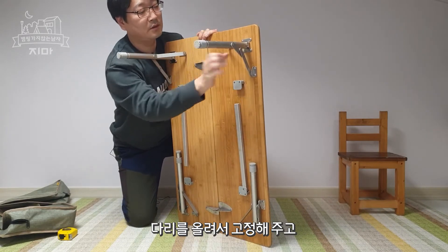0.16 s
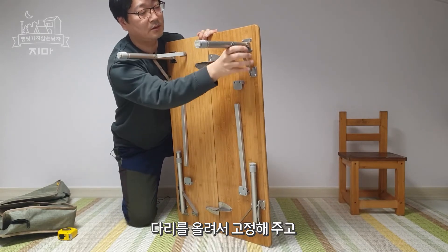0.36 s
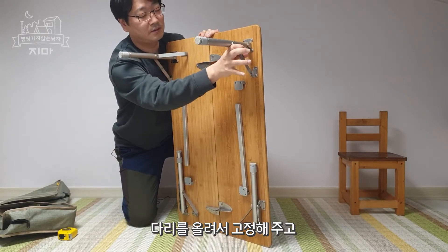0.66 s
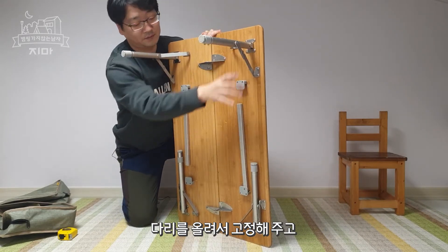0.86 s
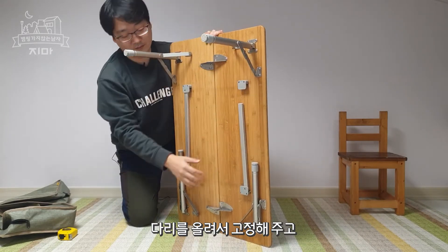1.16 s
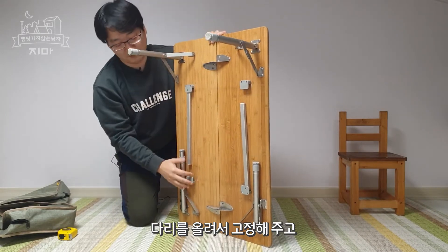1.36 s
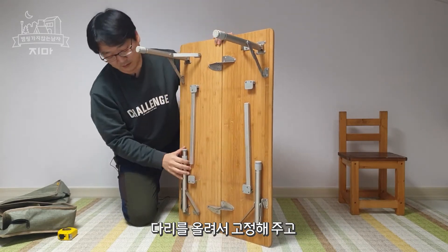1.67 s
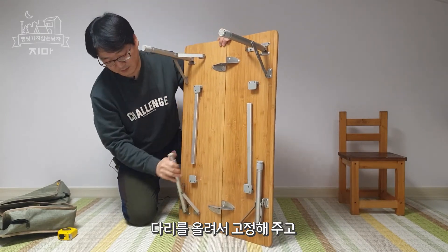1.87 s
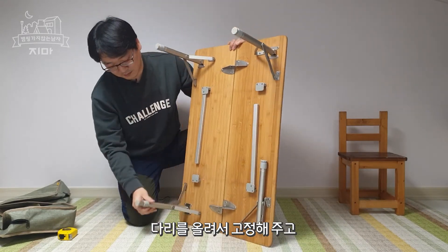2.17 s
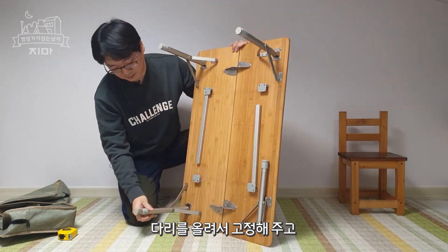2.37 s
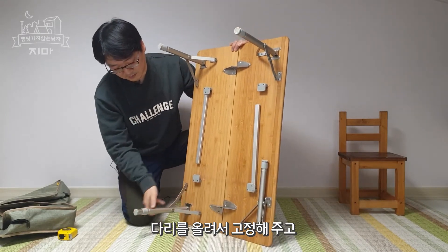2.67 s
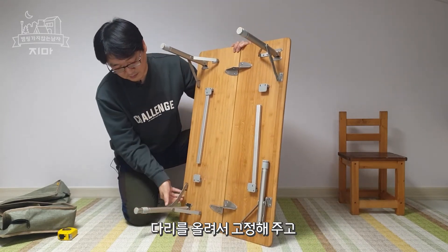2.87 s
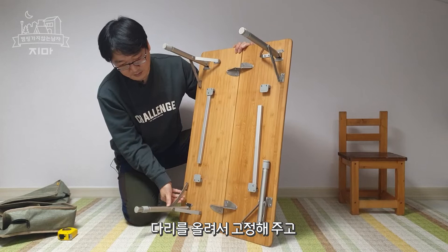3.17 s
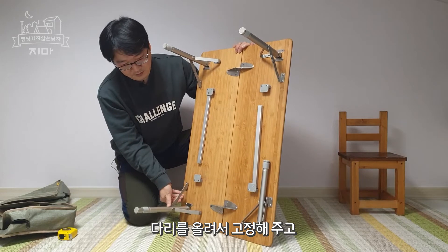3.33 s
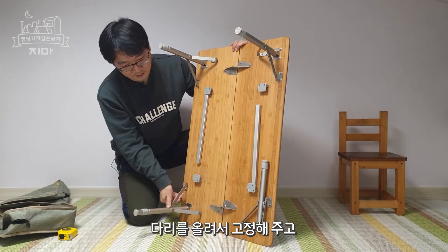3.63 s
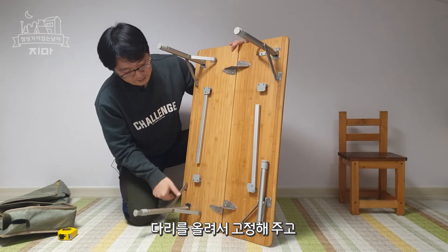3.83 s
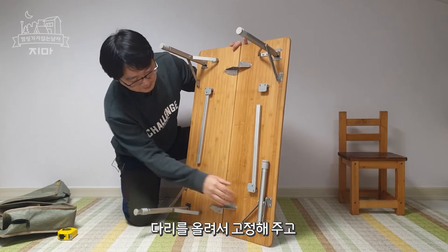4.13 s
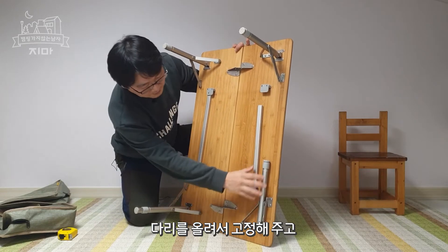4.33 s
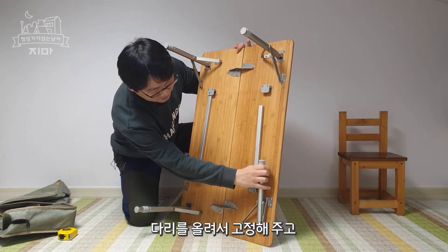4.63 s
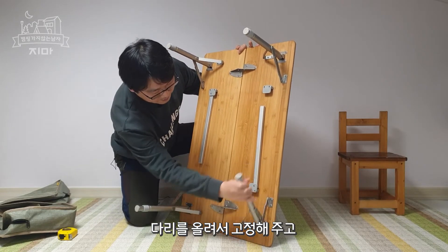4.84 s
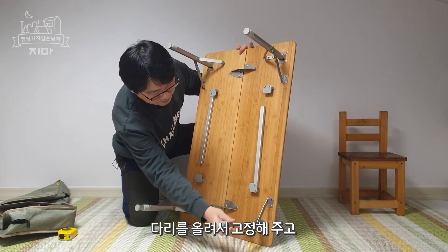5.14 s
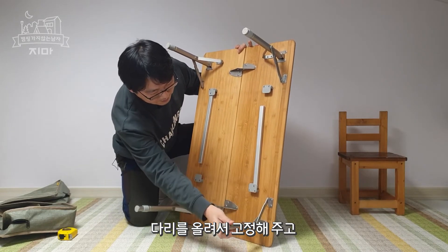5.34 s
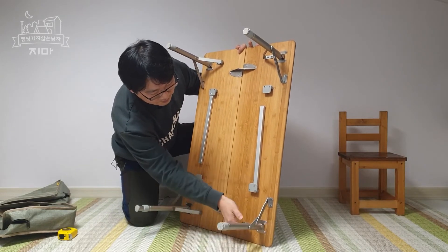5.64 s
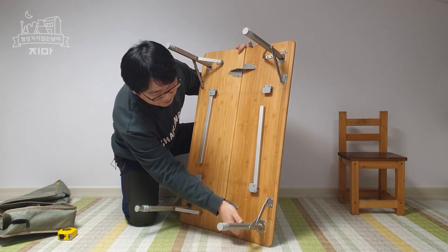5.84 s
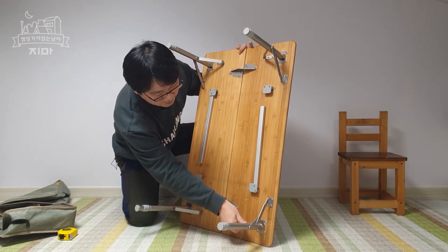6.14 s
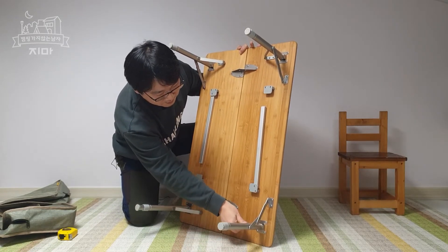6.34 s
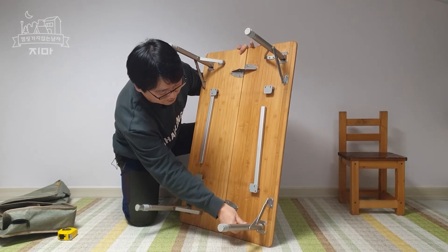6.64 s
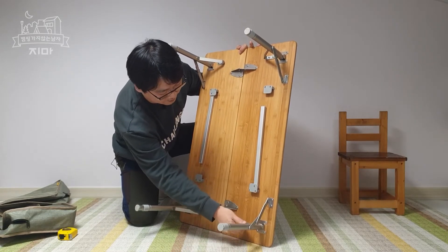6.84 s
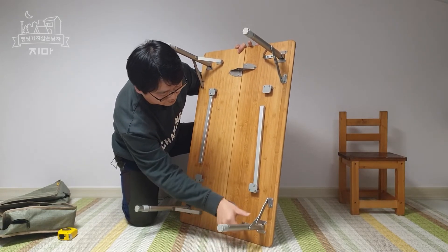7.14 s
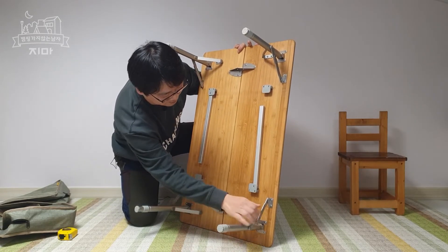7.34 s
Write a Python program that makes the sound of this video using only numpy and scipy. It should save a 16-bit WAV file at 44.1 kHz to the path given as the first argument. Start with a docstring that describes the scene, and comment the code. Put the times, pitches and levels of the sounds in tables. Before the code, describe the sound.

A quiet bare room with faint air noise and a barely noticeable hum, captured fairly close. Hands rub a wooden table board and fittings scrape softly. At 0.4 s a metal knock leads into a very loud, sharp clack at 0.5 s, hard steel on resonant wood with a short room tail, then small aftertaps to 0.8 s. From 1.4 to 2.0 s, a leg grinds briefly and clinks in a rattling cluster, ending in a strong clack just before 2 s. A bright click comes at 2.35 s, then faint rubbing and a thin, airy cloth whistle around 3 s. Dull knocks at 3.45 s and small rattles to 4 s follow. At 4.5 s come a crisp click and grind, then a faint board drone until about 5.1 s. Quiet hisses and hinge rasps occupy 5.3 to 6.1 s, another tiny whistle 6.4 s, and light taps 6.8 to 7.35 s.

```python
"""Folding a table out

Steel legs under a folding wooden table top swing out and their braces snap shut, in a quiet bare room.
Impacts excite decaying modes of board and brace; chattering steel is short noise bursts of set spectrum.
Rubbing, scraping and hissing are coloured noise, while grinding, rasping and droning are noise-fed modes.
Now and then sliding cloth whistles: bundles of sine tones whose pitches glide together."""
import sys
import numpy as np
from scipy import signal
from scipy.fft import rfft, irfft
from scipy.io import wavfile
from scipy.ndimage import uniform_filter1d

SR = 44100
rng = np.random.default_rng(int(sys.argv[2]) if len(sys.argv) > 2 else 0)


def put_to_file(sound):
    """Save the sound as 16-bit audio at rate SR, in the file named by the first command-line argument."""
    columns = np.atleast_2d(sound).T  # one column per channel
    safe = np.clip(columns, -1, 1)
    whole_steps = np.round(safe * 32767)
    wavfile.write(sys.argv[1], SR, whole_steps.astype(np.int16))


N = 330750   # samples, 7.5 s

# In all tables: levels are relative, before the gains in the functions; T60 is the time to fall by 60 dB.
# Spectra are densities: f/Hz, level per Hz/dB.

# Air and hum of the room: spectrum
AIR_SPECTRUM = [(15, -36), (25, -2), (71, 9.5), (237, -10), (301, -12.5), (404, -16), (790, -21),
                (1000, -27.5), (1310, -34.5), (2850, -32), (4500, -29), (6370, -20.5), (8100, -18),
                (11500, -32.5), (15000, -64)]
AIR_DB, HUM_DB, HUM_HZ = -68.5, -82, 300

# Hands on the table: t/s, rub on wood level/dB, scrape of fittings level/dB
HAND_LEVELS = [(0.0, -56.5, -55.5), (0.14, -79, -85), (0.27, -63, -65), (0.4, -68.5, -76), (0.55, -50, -45),
               (0.75, -72.5, -76), (0.83, -64.5, -62), (1.02, -83, -84), (1.44, -82, -73),
               (1.56, -60.5, -69), (2.02, -59.5, -55), (2.33, -64.5, -66), (2.4, -55, -52.5),
               (2.53, -67, -64.5), (2.64, -63.5, -64), (2.71, -102.5, -85), (2.94, -70.5, -79),
               (3.09, -62.5, -67.5), (3.17, -73.5, -78), (3.61, -71.5, -75.5), (3.91, -70, -66.5),
               (4.11, -78.5, -77), (4.47, -71.5, -82), (4.7, -66.5, -65), (5.18, -65, -80),
               (5.37, -66, -78), (5.55, -89, -84), (5.8, -77, -83), (6.3, -89.5, -88.5),
               (6.51, -64.5, -75.5), (6.62, -92, -94), (6.95, -65.5, -76.5), (7.12, -76.5, -87.5),
               (7.3, -74.5, -80), (7.5, -80, -92)]
# Jolts of the held board: t/s, level/dB
JOLTS_OF_BOARD = [(0.0, -50.5), (0.14, -59), (0.39, -46), (0.51, -48), (0.818, -50.5), (1.53, -51),
                  (1.68, -51.5), (2.41, -56), (2.57, -56), (2.939, -61.5), (3.09, -60), (3.7, -53),
                  (4.46, -56), (4.555, -47), (4.76, -59.5), (5.101, -51), (5.22, -56.5), (5.409, -57.5),
                  (6.299, -65), (6.469, -59.5), (6.97, -67), (7.341, -51.5), (7.47, -54)]
JOLT_RISE_S, JOLT_FALL_S = 0.027, 0.073
# Sway modes of the held board: f/Hz, level/dB, T60/s
SWAY_MODES = [(56, -9, .3), (70.4, 0, 0.23)]
# Palms on wood, creaking board, scraping fittings: spectra
RUB_SPECTRUM = [(300, -15.5), (420, -4.5), (600, -2.5), (780, -1.5), (950, -9), (1200, -25)]
CREAK_SPECTRUM = [(100, -15.5), (140, -2.5), (200, -1), (300, 0.5), (400, -4), (520, -27)]
SCRAPE_SPECTRUM = [(800, -27), (1000, -1.5), (1250, 3.5), (1600, -4), (2200, -7), (2800, -13.5),
                   (3600, -21.5)]
CREAK_DB = -2.5   # relative to the rub

# Legs turning and sleeves sliding: start t/s, length/s, hiss level/dB, thin top level/dB
SWING_STROKES = [(-0.1, 0.14, -66.5, -71), (0.3, .25, -72.5, -101), (0.76, 0.12, -73.5, -84.5),
                 (1.5, 0.43, -69.5, -87), (1.9, 0.46, -66.5, -70.5), (2.5, 0.17, -69.5, -76.5),
                 (2.66, 0.053, -74, -73), (3.0, 0.16, -77, -74.5), (3.74, 0.21, -74, -101),
                 (4.15, .3, -71, -81), (4.49, 0.045, -61, -67), (4.63, 0.19, -65.5, -66.5),
                 (4.85, 0.36, -69, -74), (5.16, .05, -76.5, -88), (5.3, .08, -70, -68),
                 (5.44, 0.085, -68, -64.5), (5.55, 0.093, -70, -74), (6.03, 0.026, -75, -93.5),
                 (6.42, 0.089, -82, -79), (6.93, 0.051, -69.5, -74), (7.35, .2, -76, -81)]
SWING_RISE_S, SWING_FALL_S = 0.034, 0.023   # rasps share these
# Dry friction and its thin top: spectra
HISS_SPECTRUM = [(3200, -24), (3600, -18), (3950, -1.5), (4900, -2.5), (6200, -1.5), (7700, -3.5),
                 (8400, -6.5), (10000, -8.5), (11500, -12)]
THIN_SPECTRUM = [(9000, -21.5), (10300, -12.5), (12700, 3.5), (14500, -9), (16000, -12)]
# Ringing part of the thin top: f/Hz, level/dB, T60/s
THIN_MODES = [(11500, 0, 0.0042)]
# The last leg droning through the board: start t/s, length/s, upper level/dB, lower level/dB
DRONE_STROKES = [(4.63, 0.52, -68, -68), (5.3, .05, -85, -73), (5.575, .05, -100, -75),
                 (5.753, 0.34, -109.5, -84.5)]
DRONE_UPPER_HZ, DRONE_LOWER_HZ, DRONE_T60_S = 1204, 782, 0.065
# Rasps of a hinge: start t/s, length/s, level/dB
RASP_STROKES = [(5.41, 0.057, -71.5), (5.56, 0.13, -71), (5.78, 0.1, -78), (5.97, .12, -78.5)]
# High modes of that hinge: f/Hz, level/dB, T60/s
HINGE_MODES = [(4390, -8, .012), (5240, -1, 0.0065), (6430, 3.5, .008), (7700, -5, 0.01)]

# Metal on metal and on wood: t/s, knock level/dB, knock f/Hz, brace rattle level/dB, click level/dB
CONTACT_EVENTS = [(0.367, -46.5, 825, -68.5, -73.5), (0.377, -28.5, 920, -38, -51.5),
                  (0.485, -29.5, 1090, -46, -53), (0.497, -45, 810, -42.5, -47.5),
                  (0.515, -13.5, 963, -18, -24.5), (0.53, -23, 1010, -33, -62),
                  (0.626, -34, 1080, -67, -59), (0.764, -54, 1250, -58, -89), (0.803, -40.5, 770, -39, -64),
                  (1.489, -33.5, 1270, -46, -60.5), (1.521, -38, 1250, -51, -56),
                  (1.541, -43, 805, -41, -54), (1.58, -30, 1400, -32, -37.5),
                  (1.624, -53, 606, -39.5, -40.5), (1.705, -33.5, 890, -43, -56.5),
                  (1.752, -39.5, 1080, -68, -68), (1.805, -45, 1210, -44, -51),
                  (1.866, -48, 1250, -50.5, -58), (1.919, -33.5, 1180, -50, -48),
                  (1.964, -23, 1270, -28.5, -37.5), (1.979, -30, 1020, -47, -50),
                  (2.247, -48.5, 604, -48, -53), (2.341, -37.5, 870, -30.5, -28),
                  (2.427, -41, 680, -37.5, -55), (2.551, -55, 606, -70.5, -66),
                  (3.451, -37, 606, -46, -56.5), (3.466, -39, 920, -42.5, -70),
                  (3.715, -56, 799, -57.5, -67), (3.784, -44.5, 900, -50.5, -58),
                  (3.807, -48, 719, -44, -55), (3.845, -53.5, 816, -52.5, -61), (3.889, -68, 840, -51, -65),
                  (3.967, -47.5, 670, -42, -55), (4.111, -60.5, 800, -63.5, -62),
                  (4.453, -54, 780, -67, -68), (4.524, -38, 1560, -56, -37), (4.554, -39, 840, -38, -37.5),
                  (4.571, -47, 766, -41, -49), (5.109, -63, 764, -73, -66.5),
                  (6.809, -56.5, 595, -66, -59.5), (6.838, -51.5, 675, -57, -57),
                  (6.944, -50, 748, -58, -55.5), (7.159, -66, 762, -59, -51.5),
                  (7.175, -47.5, 790, -51.5, -58), (7.337, -41, 747, -54, -50.5)]
# Modes of the board, its dull low modes, and the brace: f/Hz, level/dB, T60/s
BOARD_MODES = [(603, 4, 0.064), (751, 0.5, 0.064), (842, 1.5, .06), (852, 3.5, 0.019), (938, 5, 0.025),
               (1013, 1.5, 0.016), (1090, 5, 0.021), (1220, 4, .04), (1400, -3.5, 0.053),
               (1383, -16.5, 0.16)]
DULL_MODES = [(173, -4, 0.049), (274, -2, 0.023), (356.3, -3, 0.085), (486, 1.5, .05)]
BRACE_MODES = [(1450, -1, .05), (1600, -4, .03), (1910, 1, .06), (2050, -3, .03), (2330, -3, .035),
               (2900, -7, .025)]
# Brace rattle, catch click and thin tick: spectra
RATTLE_SPECTRUM = [(900, -60.5), (1300, -15), (1600, 7.5), (2000, -4), (2500, 1), (3000, -7.5), (3600, -8),
                   (4600, -57.5)]
CLICK_SPECTRUM = [(2200, -53.5), (3000, -28), (3800, -2), (4700, 0.5), (6000, -2.5), (7500, -4),
                  (9000, -14), (13000, -61)]
TICK_SPECTRUM = [(5000, -60), (7500, -11), (9000, -1.5), (11500, 0.5), (14000, -9.5), (16000, -10),
                 (18000, -57.5)]
KNOCK_OCTAVES = 0.51   # distance from the knock's pitch where a mode's share falls to 1/e
DULL_DB, DULL_DB_PER_OCTAVE = -12, -18   # at a knock of 800 Hz; higher knocks wake the dull modes less
# Softness is rattle level minus click level, held within 0 to 30 dB
CONTACT_MS, CONTACT_DOUBLES_DB = 2.9, 24.5   # decay constant at no softness; softness that doubles it
TICK_DB, TICK_SOFTENS = -7, 0.1   # tick relative to the click level; dB lost per dB of softness
BRACE_LOW_HZ, BRACE_HIGH_HZ = 1940, 2320   # range of the pitch favoured in each chatter
BRACE_OCTAVES, BRACE_DB = 0.1, 7   # 1/e half-width and lift of that pitch

# Reverberation: f/Hz, T60/s, level/dB
ROOM_BANDS = [(100, 0.62, -16.5), (282, 0.26, 13.5), (840, 0.23, 0.5), (2000, 0.33, -0.5), (5000, 0.33, -2),
              (12200, .26, 0)]
ROOM_DB, FIRST_WALL_S = -4, 0.0096   # gain; time over which the reflections grow to full density

# Leg grinding through its clip or brace slot: start t/s, length/s, low, middle and high ring level/dB
GRIND_STROKES = [(1.39, 0.055, -61, -55.5, -80), (1.445, 0.013, -48, -46.5, -78),
                 (1.495, 0.031, -51, -43, -86), (1.58, 0.034, -47, -69, -64),
                 (1.92, 0.013, -34.5, -41.5, -64), (4.47, .04, -54, -68, -47),
                 (4.525, 0.047, -40, -41.5, -72), (4.6, 0.041, -54, -58, -75), (7.47, .04, -51, -74, -64.5)]
GRIND_RISE_S, GRIND_FALL_S = 0.0078, 0.0077
# Modes of the leg in low, middle, upper and high groups: f/Hz, level/dB, T60/s (3 ms at least when rung)
LEG_MODE_GROUPS = ([(770, 4.5, 0.055), (913, 8.5, 0.017)], [(1240, 4, 0.0027), (1640, 10.5, 0.0033),
                   (1990, -10.5, 0.011)], [(2410, 0, .025)], [(7150, -5, 0.016), (9940, -6.5, 0.022),
                   (13100, -0.5, 0.0024)])

# Weave of a sleeve whistling, one list per whistle: t/s, f/Hz, level/dB
WHISTLE_CURVES = [
    [(2.898, 8530, -67), (2.97, 11220, -71.5), (3.03, 11820, -67), (3.09, 11400, -70), (3.16, 9680, -75),
     (3.21, 9920, -65.5), (3.27, 9670, -109)],
    [(5.7, 10530, -98), (5.74, 11500, -74), (5.775, 12260, -72.5), (5.82, 11270, -73), (5.86, 10100, -94.5)],
    [(6.27, 10900, -104.5), (6.32, 11460, -70), (6.37, 11600, -67.5), (6.395, 11100, -82),
     (6.44, 12150, -64.5), (6.48, 11200, -66), (6.53, 9910, -89)],
]
# Lines of the weave: ratio to the pitch, level/dB
WEAVE_LINES = [(.72, 1), (.79, -6), (.87, -12), (.94, -9), (1.0, 0), (1.12, -13)]
# Ring of the cloth: f/Hz, level/dB
CLOTH_RESPONSE = [(7000, -28), (8400, -8), (9700, -10), (11600, 3), (13500, -19)]

BASS_CUT_HZ, STOPBAND_HZ = 35, 15650   # the top is down 60 dB from the stopband edge


def amp(db):
    """Logarithmic level: gain is 10 to the power of dB / 20."""
    return 10 ** (np.asarray(db) / 20)


def rms_one(x):
    """Equal power: scale a signal to rms 1."""
    return x / np.sqrt(np.mean(x ** 2) + 1e-20)


def in_time(rows, outside_db=-120):
    """Linear interpolation: columns of a curve per sample, with -120 in every column outside its span."""
    s, *columns = np.transpose(rows)
    t = np.arange(N) / SR
    return [np.interp(t, s, column, outside_db, outside_db) for column in columns]


def at_hz(points, hz, order=1):
    """Logarithmic frequency scale: one column of a table, interpolated by octave."""
    table = np.array(points)
    return np.interp(np.log(hz), np.log(table[:, 0]), table[:, order])


def drift(rate):
    """Low-passed randomness: noise through a double pole near the rate in Hz, at rms 1."""
    step = 40   # samples between slow values
    pole = np.exp(-2 * np.pi * rate * step / SR)
    noise = rng.standard_normal(N // step + 2002)
    slow = signal.lfilter([1], [1, -2 * pole, pole * pole], noise)[2000:]   # settled part
    return np.interp(np.arange(N) / step, np.arange(len(slow)), rms_one(slow))


def ring(force, hz, t60):
    """Damped resonance: a unit impulse starts a decaying sine of initial height 1."""
    radius = amp(-60 / (max(t60, .003) * SR))
    angle = 2 * np.pi * hz / SR
    return signal.lfilter([0, np.sin(angle)], [1, -2 * radius * np.cos(angle), radius ** 2], force + 1e-18)


def bands(size):
    """Filter bank: quarter-octave bands of white noise with their centres."""
    edges = 25 * 2 ** (np.arange(38) / 4)
    white = rng.standard_normal((2, size))   # neighbouring bands use different noise
    for k, (low, high) in enumerate(zip(edges, edges[1:])):
        sos = signal.butter(2, [low, high], "band", fs=SR, output="sos")
        yield np.sqrt(low * high), signal.sosfilt(sos, white[k % 2])


def coloured(spectrum, patchy_db, rate):
    """Spectral shaping: noise bands of set density flicker, partly together; rms 1."""
    out, together = 0, drift(rate)
    lowest, highest = np.array(spectrum)[[0, -1], 0]
    for hz, band in bands(N):
        if lowest < hz < highest:
            flicker_db = patchy_db * (.7 * together + drift(rate))
            out = out + amp(at_hz(spectrum, hz) + flicker_db) * band
    return rms_one(out)


def rubbed(modes):
    """Forced vibration: steady friction feeds noise to the modes; rms 1."""
    rings = [amp(level_db) * ring(rng.standard_normal(N), hz, t60) for hz, level_db, t60 in modes]
    return rms_one(sum(rings))


def strokes(rows, rise_s, fall_s):
    """Addition of power: strokes swell up to their start, hold and decay; one gain per level column."""
    t, power = np.arange(N) / SR, 0
    for start, length, *levels_db in rows:
        before = np.minimum(t - start, 0) / rise_s
        after = np.maximum(t - start - length, 0) / fall_s
        shape = np.exp(-before ** 2 - after)
        power = power + (amp(levels_db)[:, None] * shape) ** 2
    return np.sqrt(power)


def room_tone():
    """Stationary noise: still air and microphone noise, with a faint hum as a narrow noise-fed mode."""
    air = coloured(AIR_SPECTRUM, patchy_db=1.2, rate=3)
    hum = rubbed([(HUM_HZ, 0, .6)])
    return amp(AIR_DB) * air + amp(HUM_DB) * hum


def hands():
    """Sliding friction: palms rub the wood and fittings scrape; the held board sways and creaks."""
    rub_db, scrape_db = in_time(HAND_LEVELS)
    jolts = [(s, 0, db) for s, db in JOLTS_OF_BOARD]
    sway_gain, = strokes(jolts, JOLT_RISE_S, JOLT_FALL_S)
    sway = sway_gain * rubbed(SWAY_MODES)
    creak = coloured(CREAK_SPECTRUM, patchy_db=1.5, rate=14)
    rub = coloured(RUB_SPECTRUM, patchy_db=1.5, rate=14)
    scrape = coloured(SCRAPE_SPECTRUM, patchy_db=1.5, rate=15)
    return sway + amp(rub_db) * (rub + amp(CREAK_DB) * creak) + amp(scrape_db) * scrape


def hinges():
    """Dry friction: turning and sliding hiss, a hinge rasps on its modes and the last leg drones on two modes."""
    hiss_gain, thin_gain = strokes(SWING_STROKES, SWING_RISE_S, SWING_FALL_S)
    rasp_gain, = strokes(RASP_STROKES, SWING_RISE_S, SWING_FALL_S)
    upper_gain, lower_gain = strokes(DRONE_STROKES, 0.023, 0.039)
    hiss = coloured(HISS_SPECTRUM, patchy_db=3.0, rate=7)
    thin = amp(-4.5) * coloured(THIN_SPECTRUM, patchy_db=2.0, rate=9)
    thin = thin + amp(-0.5 + 1.5 * drift(8.8)) * rubbed(THIN_MODES)
    drone = upper_gain * rubbed([(DRONE_UPPER_HZ, 0, DRONE_T60_S)])
    drone = drone + lower_gain * rubbed([(DRONE_LOWER_HZ, 0, DRONE_T60_S)])
    return hiss_gain * hiss + thin_gain * thin + drone + rasp_gain * rubbed(HINGE_MODES)


def struck(modes, peak_db, spread_db, pitch_hz=None):
    """Modal excitation: an impulse per contact, of random strength per mode, strongest near any given pitch."""
    out = np.zeros(N)
    at = [round(row[0] * SR) for row in CONTACT_EVENTS]
    luck_db = spread_db * rng.standard_normal((len(CONTACT_EVENTS), len(modes)))
    for k, (hz, level_db, t60) in enumerate(modes):
        near = 1
        if pitch_hz is not None:
            near = np.exp(-(np.log2(hz / pitch_hz) / KNOCK_OCTAVES) ** 2)
        sign = (-1) ** (k // 2)
        force = np.zeros(N)
        force[at] = near * sign * amp(peak_db + level_db + luck_db[:, k])
        out += ring(force, hz, t60)
    return out


def chatter(parts_db, spectra, brace_hz, contact_ms):
    """Magnitude and phase: set spectra give the colour, the phase of dying noise gives the timing."""
    size = 2048
    hz = np.fft.rfftfreq(size, 1 / SR)[1:]
    t_ms = np.arange(size) / SR * 1000
    out = np.zeros(N + size)
    shapes = [rms_one(amp(at_hz(points, hz))) for points in spectra]
    noise = rng.standard_normal((len(CONTACT_EVENTS), size))
    contact_ms = np.clip(contact_ms, .2, 12)
    for row, gains, favoured_hz, white, ms in zip(CONTACT_EVENTS, amp(parts_db).T, brace_hz, noise, contact_ms):
        dying = white * np.sqrt(t_ms) * np.exp(-t_ms / ms)
        timing = np.exp(1j * np.angle(rfft(dying)[1:]))
        lift = amp(BRACE_DB * np.exp(-(np.log2(hz / favoured_hz) / BRACE_OCTAVES) ** 2))
        burst = irfft(np.append(0, (gains @ shapes) * lift * timing), size)
        fade = np.exp(-t_ms / (3.2 * ms)) * np.tanh(t_ms / .4)
        at = round(row[0] * SR)
        out[at:at + size] += burst * fade
    return out[:N]


def contacts():
    """Impact: the board knocks, the brace rattles and the catch clicks; returned apart is the board's low boom."""
    _, knock_db, pitch_hz, rattle_db, click_db = np.transpose(CONTACT_EVENTS)
    knock = struck(BOARD_MODES, knock_db - 8, spread_db=2.5, pitch_hz=pitch_hz)
    wood = signal.butter(2, [550, 1800], "band", fs=SR, output="sos")   # wood takes a blow softly
    knock = signal.sosfilt(wood, knock)

    soft_db = np.clip(rattle_db - click_db, 0, 30)
    brace_hz = rng.uniform(BRACE_LOW_HZ, BRACE_HIGH_HZ, len(CONTACT_EVENTS))
    contact_ms = CONTACT_MS * 2 ** (soft_db / CONTACT_DOUBLES_DB)
    tick_db = click_db + TICK_DB - TICK_SOFTENS * soft_db
    parts_db = [rattle_db + 15.5, click_db + 20.0, tick_db + 18]
    steel = chatter(parts_db, [RATTLE_SPECTRUM, CLICK_SPECTRUM, TICK_SPECTRUM], brace_hz, contact_ms)

    dull_db = knock_db + DULL_DB + DULL_DB_PER_OCTAVE * np.log2(pitch_hz / 800)
    boom = struck(DULL_MODES, dull_db, spread_db=2.64)
    boom = signal.sosfilt(signal.butter(2, 500, fs=SR, output="sos"), boom)   # the heavy board yields slowly

    brace = struck(BRACE_MODES, rattle_db - 12, spread_db=4.0)
    brace = signal.sosfilt(signal.butter(2, [1100, 3300], "band", fs=SR, output="sos"), brace)
    return knock + steel + brace, boom


def room(x):
    """Reverberation: dense reflections grow up to the first wall's delay, each band dying at its own rate."""
    t = np.arange(int(.8 * SR)) / SR
    tail = 0
    for hz, band in bands(len(t)):
        level_db = at_hz(ROOM_BANDS, hz, order=2) - 60 * t / at_hz(ROOM_BANDS, hz)
        tail = tail + band * amp(level_db)
    tail = tail * np.clip(t / FIRST_WALL_S, 0, 1) ** 2
    return signal.fftconvolve(x, tail / np.sqrt(np.sum(tail ** 2)))[:N]   # tail of unit energy


def grinds():
    """Uneven slip: steel sliding on steel feeds noise to the leg's modes at a fluctuating level."""
    low, middle, high = strokes(GRIND_STROKES, GRIND_RISE_S, GRIND_FALL_S)
    upper = amp(-14) * high + amp(-20) * low
    gains = low, middle, upper, high
    ringing = sum(gain * rubbed(modes) for gain, modes in zip(gains, LEG_MODE_GROUPS))
    return amp(-8 + 1.12 * drift(65)) * ringing


def whistles():
    """Periodic friction: weave lines follow sliding speed and stand out where they cross the cloth's ring."""
    speed_hz, level_db = in_time([row for rows in WHISTLE_CURVES for row in rows])
    glide_hz = uniform_filter1d(np.maximum(speed_hz, 1), size=1500)   # 34 ms smoothing
    out = 0
    for ratio, weave_db in WEAVE_LINES:
        hz = ratio * glide_hz * (1 + 0.0017 * drift(30))
        line_db = level_db + weave_db + at_hz(CLOTH_RESPONSE, hz) + 5.9 * drift(9.6)   # broken line
        out = out + amp(line_db) * np.sin(2 * np.pi * np.cumsum(hz) / SR)
    return out


def scene():
    """Superposition: sharp contacts and grinds reverberate; the boom and quiet layers are added dry."""
    sharp, boom = contacts()
    sharp = sharp + grinds()
    reverberant = sharp + amp(ROOM_DB) * room(sharp)
    quiet = hands() + hinges() + whistles() + room_tone()
    return (reverberant + boom + quiet)[None]


def record(dry):
    """Band limiting: the microphone drops the deepest bass and the top is cut."""
    thin = signal.sosfilt(signal.butter(2, BASS_CUT_HZ, "high", fs=SR, output="sos"), dry)
    return signal.sosfilt(signal.cheby2(20, 60, STOPBAND_HZ, fs=SR, output="sos"), thin)


dry = scene()
out = record(dry)
put_to_file(out)
```